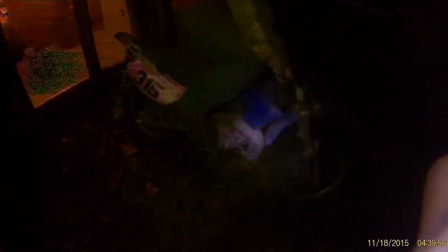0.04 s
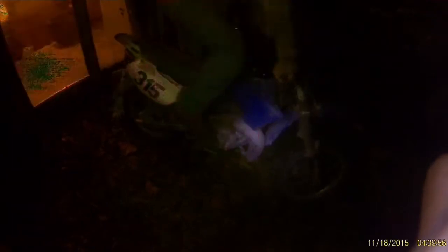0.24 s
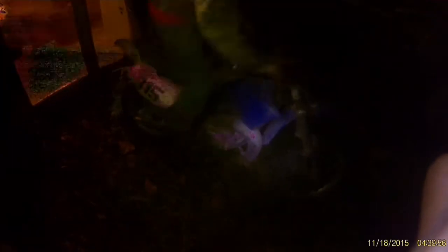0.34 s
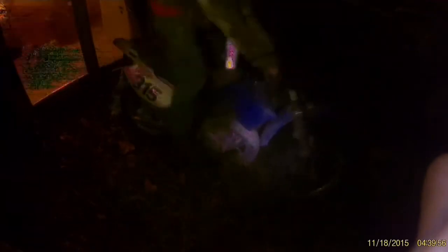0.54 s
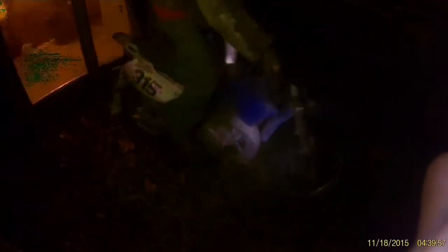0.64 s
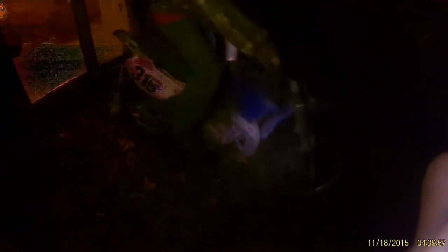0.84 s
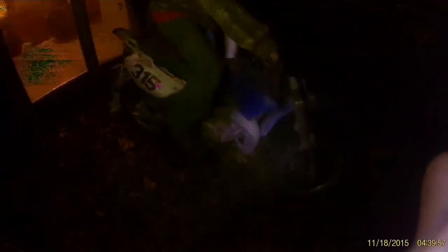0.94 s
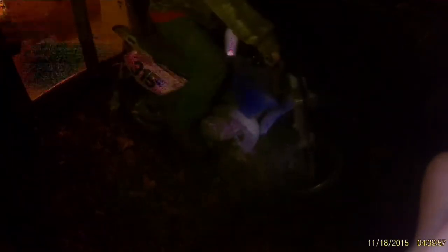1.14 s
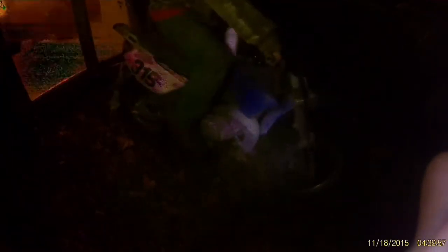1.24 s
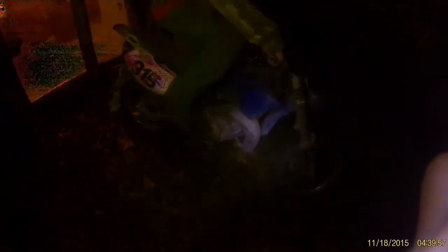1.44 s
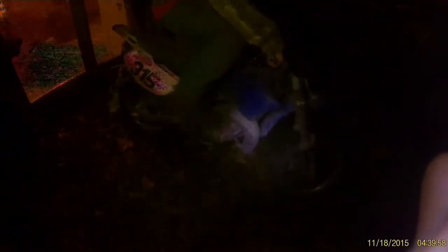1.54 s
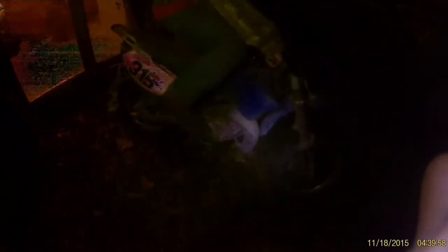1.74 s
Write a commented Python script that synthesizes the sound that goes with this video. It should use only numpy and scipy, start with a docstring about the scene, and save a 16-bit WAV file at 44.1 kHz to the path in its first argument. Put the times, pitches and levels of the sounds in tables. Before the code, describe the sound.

One hard kickstart of a dirt bike, clanking and puffing without the engine catching.

```python
"""A dirt bike is kicked over in a garage and does not start. First the lever and gears clank and
rattle in the engine cases. At 0.2 s the lever slams on its stop and the piston pushes its strongest
puffs through the exhaust pipe, which rings. Weaker puffs follow until 0.8 s. Near 1.25 s the lever
swings back and knocks on the frame, then the rattle dies away. All along there is a short echo and
a quiet hiss, and a small microphone flattens the loudest blows."""
import sys
import numpy as np
from scipy import signal
from scipy.fft import rfft, irfft
from scipy.io import wavfile

SR = 44100
rng = np.random.default_rng(int(sys.argv[2]) if len(sys.argv) > 2 else 0)


def generate_wav(sig):
    """Save sig (samples, or channels by samples) to the path in sys.argv[1] as 16-bit PCM at SR."""
    pcm = np.round(np.clip(np.atleast_2d(sig).T, -1, 1) * 32767).astype(np.int16)
    wavfile.write(sys.argv[1], SR, pcm)


N = 79380


def piston_puffs():
    """Each puff of air swells, holds, fades and leaves the exhaust pipe ringing."""
    # t/s, level/dB, f/Hz, rise/ms, hold/ms, boom compared with the puff/dB
    puffs = [(.156, -34.5, 261, 3.4, 12.3, -1), (0.2022, -12, 258.4, 5.38, 1.8, -30),
             (0.2395, -7, 254, 5.44, 0.99, -32), (0.281, -10, 247.6, 4, 6.14, -18),
             (0.303, -29, 295, 1, 13, -16), (0.328, -30.5, 312, 3.5, 12.6, -8),
             (0.409, -20, 232, 5.4, 11, -17), (0.432, -38.5, 233, 0.63, 10, -34),
             (0.468, -42, 253, 7.9, 28, -30), (0.499, -39.5, 238, 4.9, 11.6, 0.5),
             (0.6204, -23, 269, 4.44, 3.1, -22.5), (0.788, -44, 289, 3.5, 7.3, -18.5)]
    # higher pipe tones in each puff: f/Hz, level/dB
    overtones = [(372, -12), (475, -11.5)]
    # the pipe's ring and its deep boom: f/Hz, level/dB, time to fade by 60 dB/s
    pipe_tones = [(231.2, -2, 0.17), (384, -10, 0.13), (502, -10.5, 0.1)]
    boom_tones = [(52.3, -10.5, 0.31), (122.6, 1.5, 0.12)]
    fade_ms, glide_per_s = 2.14, 130
    pipe_db, full_db = -6, -16  # puffs above full_db make the pipe ring no louder
    out, pushes = np.zeros(N), np.zeros((2, N))
    t = np.arange(SR // 8) / SR
    ms = t * 1000
    for at, db, hz, rise_ms, hold_ms, boom_db in puffs:
        start = int(at * SR)
        swell = np.sin(np.pi / 2 * np.clip(ms / rise_ms, 0, 1)) ** 1.46
        fade = np.exp(-np.maximum(ms - rise_ms - hold_ms, 0) / fade_ms)
        # the stronger the puff, the faster its pitch climbs
        phase = 2 * np.pi * hz * t * (1 + glide_per_s * undb(db) * t / 2)
        tone = np.sin(phase) + sum(undb(g) * np.sin(2 * np.pi * f * t) for f, g in overtones)
        out[start:start + len(t)] += undb(db) * swell * fade * tone
        peak = start + int(rise_ms * SR / 1000)
        pushes[:, peak] += undb([min(db, full_db) + pipe_db, db + boom_db])
    t = np.arange(SR // 2) / SR
    for push, tones in zip(pushes, (pipe_tones, boom_tones)):
        out += signal.fftconvolve(push, ring(tones, t, rise_s=0.0022))[:N]
    return out


def lever_slam():
    """The lever hits its stop and bounces; each hit rings with a bright crack."""
    # t/s, level/dB
    hits = [(0.2117, -13), (0.2127, -4.5), (0.2145, -15), (0.2177, -16.5)]
    # tones of lever and stop: f/Hz, level/dB, time to fade by 60 dB/s
    stop_tones = [(1571, 1, 0.014), (1463, -14, 0.013), (1983, -11, 0.021), (2318, -14, 0.037),
                  (4380, -21.5, 0.025)]
    crack_db, crack_fade_s = -14.5, 0.033
    out, t = np.zeros(N), np.arange(SR // 8) / SR
    for at, db in hits:
        noise = band_pass(rng.standard_normal(len(t)), hz=3890, width_hz=2600)
        crack = undb(crack_db) * noise * 1000. ** (-t / crack_fade_s)
        out[int(at * SR):][:len(t)] += undb(db) * (ring(stop_tones, t, rise_s=0.00024) + crack)
    return out


def engine_clatter():
    """Metal blows clank and loose turning parts rattle, heard in five pitch ranges."""
    # t/s, middle level/dB, low and treble compared with it/dB, time to fade by 60 dB/ms
    clanks = [(0.0314, -43, -41, -14.5, 13.4), (0.0865, -40, -1.5, -33, 152), (0.0944, -41, -26, -19, 124),
              (0.1375, -40.5, -1, -17.5, 97), (0.153, -42, -0.5, -15.5, 180), (0.183, -37, 4.5, -23.5, 420),
              (0.2419, -27.5, 2, -16, 43), (0.284, -21.5, -6, -23, 34.5), (0.3159, -31, 1, -19.5, 54),
              (0.3818, -35.5, -1, -19, 66), (0.387, -36.5, -15, -13.5, 40),
              (0.4153, -34.5, -2.5, -27, 21.4), (0.4511, -37.5, 3.5, -23, 65), (0.4846, -39, -8, -18.5, 43),
              (0.5582, -42.5, -1, -15, 81), (0.5738, -40.5, -1.5, -20.5, 47),
              (0.5965, -50.5, -0.5, -20, 97), (0.622, -44.5, -7, -22, 41), (0.7154, -56, 12, -23, 194),
              (0.7261, -43.5, 4, -11, 66), (0.75, -52.5, -0.5, -16.5, 204), (0.864, -61, -1.5, -9.5, 190),
              (0.8995, -58, 0.5, -12.5, 180), (0.9327, -57.5, -6, -16, 56), (0.993, -53.5, -17, -17.5, 22),
              (1.1005, -53.5, -6.5, -18, 26), (1.1532, -55.5, 7.5, -22, 27.6), (1.2193, -44, -5, -23.5, 95),
              (1.2611, -30, -9, -18.5, 86), (1.2675, -31.5, 0.5, -15.5, 30), (1.2927, -37, 4, -21.5, 51),
              (1.3473, -34.5, -9.5, -15.5, 77), (1.3729, -40, -21, -13, 57), (1.3817, -40, -5.5, -21, 56),
              (1.3955, -44.5, -16, -17, 80), (1.414, -50, -33, -26, 41), (1.4438, -52.5, -16, -33, 86),
              (1.5, -63, -30, -6, 41), (1.51, -48.5, -22, -15.5, 52), (1.5332, -44.5, 1.5, -17.5, 85),
              (1.705, -53, -15.5, -16.5, 84)]
    # loose rattle: t/s, middle/dB, low/dB, treble/dB, bass/dB
    rattle = np.array([(0.0, -69, -66.5, -87, -80), (0.144, -75, -130, -83, -55.5),
                       (0.236, -46.5, -46, -66, -50.5), (0.255, -40.5, -40, -51, -46),
                       (0.34, -49, -50.5, -69, -52.5), (0.64, -68, -64, -83.5, -57),
                       (0.922, -76, -81.5, -91.5, -79), (1.475, -68.5, -70, -82.5, -67),
                       (1.8, -74, -72.5, -101, -70.5)])
    # pitch bands that colour the clanks and rattle: f/Hz, width/Hz, level/dB
    middle = [(1223, 198, -1.5), (1455.5, 151, 4.5), (1720, 340, -1.5), (2194, 532, -8.5)]
    low = [(271.6, 180, -5), (512, 254, -5), (700, 134, -2), (890, 330, -2.5)]
    treble = [(3095, 1300, 4), (4237, 800, 4), (5250, 780, -0.5), (6390, 850, -0.5), (8170, 1000, -6.5),
              (11140, 3000, -16)]
    bass = [(163, 320, -1.3), (293, 70, -0.75)]
    top = [(8900, 1500, 2), (10940, 1500, 2), (12800, 1800, -5)]
    ranges, roughness_db = (middle, low, treble, bass, top), (1.49, 1.7, 3.16, 2.3, 3.5)
    rise_ms, blow_db, top_db = 0.9, 5.5, -12
    t, blows = np.arange(N) / SR, np.zeros((5, N))
    power = np.array([undb(2 * np.interp(t, rattle[:, 0], rattle[:, c])) for c in (1, 2, 3, 4, 3)])
    power[-1] *= undb(2 * top_db)  # the top follows the loose rattle's treble, more quietly
    for at, db, low_db, treble_db, fade_ms in clanks:
        ms = np.maximum(t - at, 0) * 1000
        gains = undb(db + np.array([0, low_db, treble_db]))
        burst = (1 - np.exp(-ms / rise_ms)) * 1000. ** (-ms / fade_ms)
        power[:3] += np.outer(gains, burst) ** 2
        blows[:3, int(at * SR)] += gains * undb(blow_db)
    shakes = blows + np.sqrt(power) * [rough_noise(db) for db in roughness_db]
    return sum(clatter_resonance(shake, bands) for shake, bands in zip(shakes, ranges))


def clatter_resonance(shake, bands):
    """Pass the pitches at which the clatter rings; white noise would keep its level."""
    def resonate(x):
        return sum((-1) ** k * undb(db) * band_pass(band_pass(x, hz, width), hz, width)
                   for k, (hz, width, db) in enumerate(bands))
    click = signal.unit_impulse(8192)
    return resonate(shake) / np.linalg.norm(resonate(click))


def frame_knocks():
    """The lever swings back onto the frame; a longer contact gives a duller knock."""
    # t/s, level/dB, contact/ms
    knocks = [(1.218, -41.5, 0.26), (1.248, -35, 1.45), (1.2616, -26, 0.11), (1.2665, -19.5, 0.53),
              (1.2924, -29, 1.13), (1.453, -49.5, 0.96)]
    # f/Hz, level/dB, time to fade by 60 dB/s
    frame_tones = [(227.5, -2.5, 0.045), (310, 4, 0.044), (518, -20, 0.1), (759, -8.5, 0.095),
                   (953, -8.5, 0.094), (1097, -9, 0.098), (1287, -6, 0.11), (1440, -19, 0.056),
                   (1803, -13.5, 0.078), (2200, -16.5, 0.11)]
    low_cut_hz = 128  # the thin frame gives off little sound below this
    push, t = np.zeros(N), np.arange(SR // 4) / SR
    for at, db, contact_ms in knocks:
        bump = np.hanning(int(contact_ms * SR / 1000) + 3)
        push[int(at * SR):][:len(bump)] += undb(db) * bump / bump.sum()
    ringing = signal.fftconvolve(push, ring(frame_tones, t, rise_s=0.0013))[:N]
    return signal.lfilter(*signal.butter(2, low_cut_hz, "high", fs=SR), ringing)


def garage_echo(sound, fade_s=0.28, dull_hz=2950):
    """The walls send back a short, dull echo that starts after 6 ms."""
    t = np.arange(SR // 2) / SR
    tail = rng.standard_normal(len(t)) * 1000. ** (-t / fade_s) * (t > .006)
    tail = signal.lfilter(*signal.butter(1, dull_hz, fs=SR), tail)
    return signal.fftconvolve(sound, tail / np.linalg.norm(tail))[:N]


def background_noise(level_db=-67.5):
    """The room rumbles quietly and the microphone hisses."""
    # f/Hz, relative level/dB
    shape = [(12, -45.5), (20, -2.5), (68, -1.5), (150, -19), (293, -6), (459, -11), (718, -17),
             (873, -16), (1710, -24.5), (2530, -27.5), (16000, -37.5)]
    hz, db = np.transpose(shape)
    f = np.maximum(np.arange(N // 2 + 1) * SR / N, 1)
    gains = undb(np.interp(np.log(f), np.log(hz), db))
    noise = irfft(rfft(rng.standard_normal(N)) * gains, N)
    return noise * undb(level_db) / noise.std()


def ring(tones, t, rise_s):
    """A struck object's tones build up quickly, then fade."""
    fading = sum(undb(db) * np.sin(2 * np.pi * hz * t) * 1000. ** (-t / s) for hz, db, s in tones)
    return fading * (1 - np.exp(-t / rise_s))


def rough_noise(jump_db):
    """Noise whose level jumps about 600 times a second."""
    step = SR // 600
    noise = rng.standard_normal(N)
    jumps = np.repeat(rng.standard_normal(N // step + 1), step)[:N]
    return noise * undb(jump_db * jumps)


def band_pass(x, hz, width_hz):
    """Keep the pitches near hz."""
    return signal.lfilter(*signal.iirpeak(hz, hz / width_hz, fs=SR), x)


def undb(db):
    """Turn decibels into a gain."""
    return 10 ** (np.asarray(db) / 20)


def scene():
    """The bike, its echo and the background, in one channel."""
    bike = piston_puffs() + engine_clatter() + lever_slam() + frame_knocks()
    return (bike + undb(-22) * garage_echo(bike) + background_noise())[None]


def record(dry):
    """The microphone flattens the loudest peaks and cuts the highest treble."""
    clip_level, top_hz = .27, 15900
    clipped = dry / (1 + np.abs(dry / clip_level) ** 6) ** (1 / 6)
    return signal.sosfilt(signal.ellip(10, .2, 80, top_hz, fs=SR, output="sos"), clipped)


dry = scene()
out = record(dry)
generate_wav(out)
```